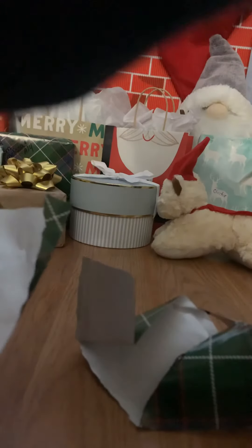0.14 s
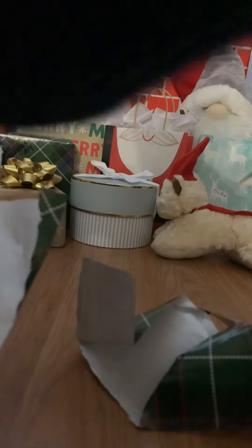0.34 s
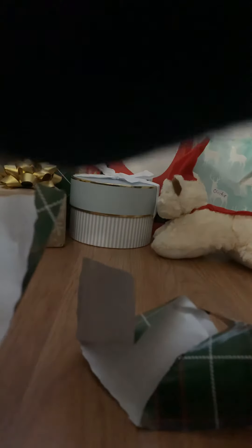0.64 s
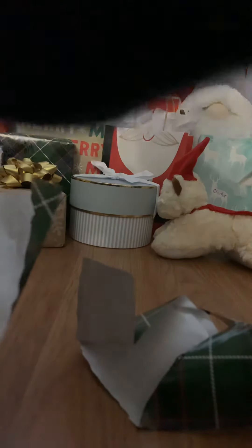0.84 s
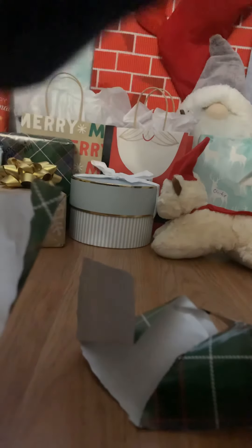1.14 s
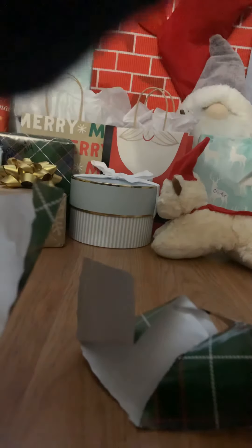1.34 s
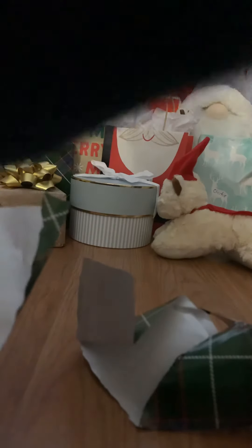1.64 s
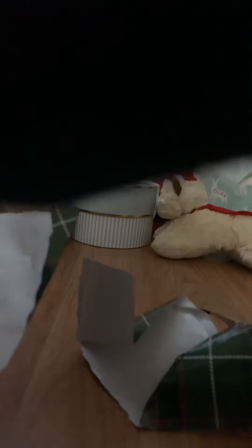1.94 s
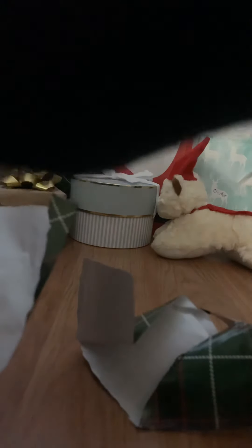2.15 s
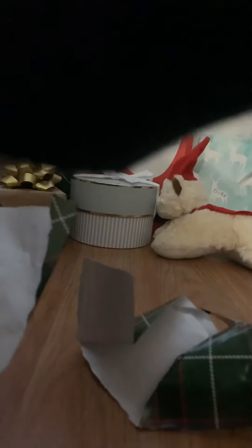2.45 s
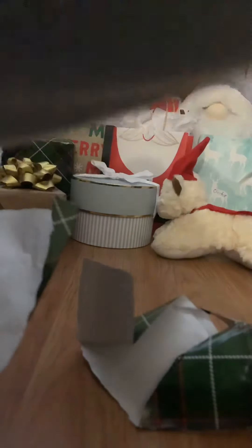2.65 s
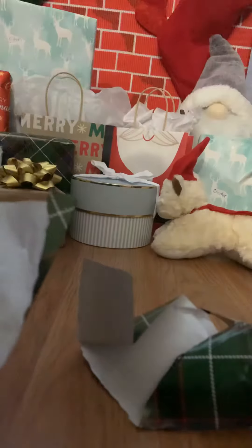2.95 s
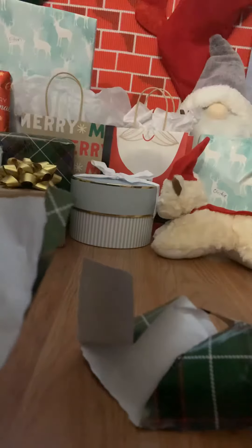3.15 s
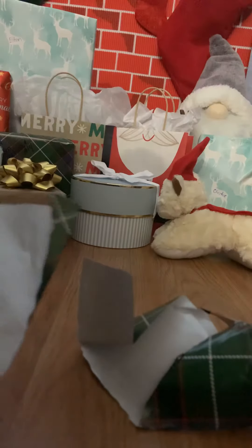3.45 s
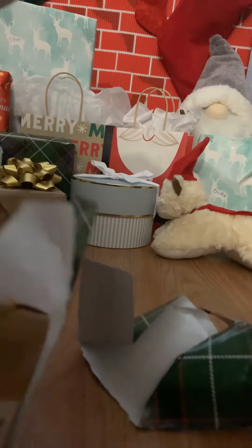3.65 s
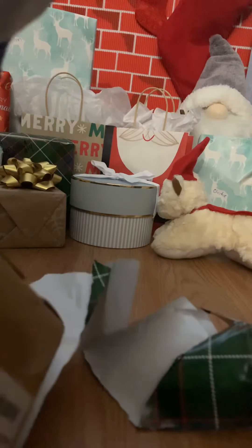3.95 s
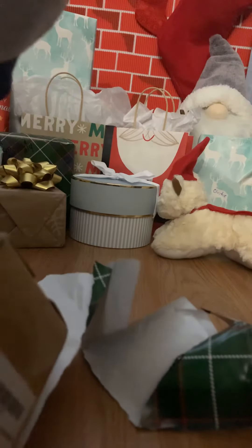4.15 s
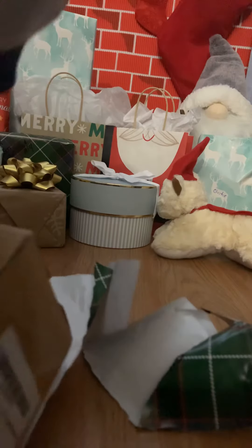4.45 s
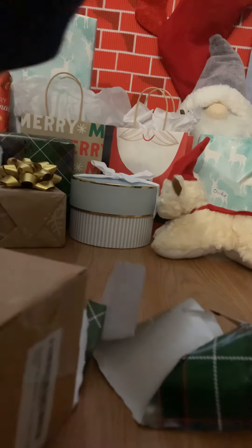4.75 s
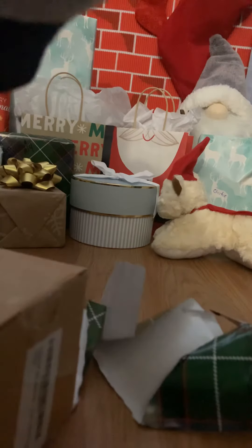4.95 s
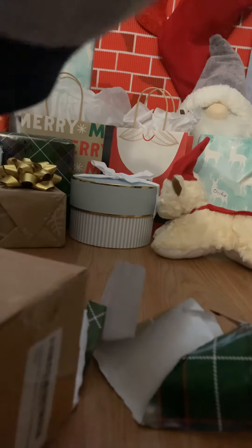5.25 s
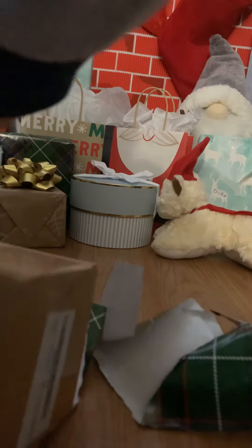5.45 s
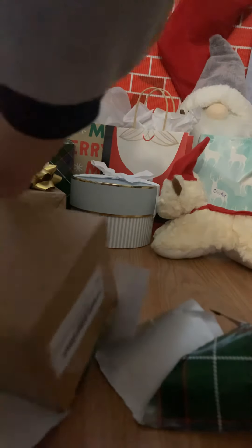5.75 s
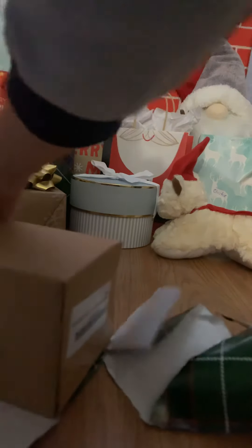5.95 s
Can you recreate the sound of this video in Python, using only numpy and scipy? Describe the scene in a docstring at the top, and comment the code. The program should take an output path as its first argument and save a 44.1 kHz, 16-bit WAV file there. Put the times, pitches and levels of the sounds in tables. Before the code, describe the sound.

Wrapping paper is ripped off a cardboard box by hand in short tears, with crinkles, soft knocks and rustling in a quiet room.

```python
"""In a small quiet room, close by, wrapping paper is ripped off a cardboard box by hand.
Hands slide over the parcel as hissing, humming grains; creases snap as short cascades of slips.
Fibres part in a few short tears of dense clicks, the last a stuttering one.
Bumps are damped panel tones with a rattle; box and floor modes and room echoes answer them."""
import sys
import numpy as np
from scipy import signal
from scipy.fft import rfft, irfft
from scipy.io import wavfile
from scipy.ndimage import uniform_filter1d

SR = 44100
rng = np.random.default_rng(int(sys.argv[2]) if len(sys.argv) > 2 else 0)


def master(y):
    """Save y as 16-bit WAV."""
    cut = np.clip(np.atleast_2d(y).T, -1, 1)
    pcm = np.round(cut * 32767)  # scale
    wavfile.write(sys.argv[1], SR, pcm.astype(np.int16))


N = 269892
TIME = np.arange(N) / SR


def amp(db):
    """Decibels to linear gain."""
    return 10 ** (np.asarray(db) / 20)


def unit(x):
    """Scale to rms 1."""
    return x / np.sqrt(np.mean(x ** 2) + 1e-20)


def read_curve(points, hz):
    """A table's value at hz, joined on a log-frequency axis."""
    table_hz, value = np.transpose(points)
    return np.interp(np.log(hz + 1), np.log(table_hz + 1), value)


def add(mix, start_s, sound):
    """Lay a sound into the mix, cut off at the mix's end."""
    part = mix[max(round(start_s * SR), 0):][:len(sound)]
    part += sound[:len(part)]


def colour(x, db_at, size=2048):
    """Causal minimum-phase filter whose gain in dB is db_at(Hz)."""
    gain_db = np.maximum(db_at(abs(np.fft.fftfreq(size, 1 / SR))), -100)
    log_gain = np.log(amp(gain_db))
    taps = np.fft.ifft(np.exp(np.conj(signal.hilbert(log_gain)))).real
    return signal.fftconvolve(x, taps[:size // 2])[:len(x)]


def hump(hz, centre_hz, octaves):
    """A bell of height 1 on the log-frequency axis."""
    return np.exp(-.5 * (np.log2((hz + 1) / centre_hz) / octaves) ** 2)


def shelf(hz):
    """0 in the body of the sound, 1 in its treble."""
    return hz ** 3 / (hz ** 3 + 3300 ** 3)


def wander(per_s):
    """Slow chance of rms 1, with per_s random turning points a second."""
    knots = rng.standard_normal(N // 20)
    return unit(np.interp(TIME * per_s, np.arange(len(knots)), knots))


def gate(start_s, length_s, attack_s, release_s):
    """Rises, holds for the length of the movement, dies away."""
    t = TIME - start_s
    return np.clip(t / attack_s, 0, 1) * np.exp(-np.maximum(t - length_s, 0) / release_s)


def grains(per_s, spread_db, clump_db, clumps_per_s):
    """Tiny clicks of uneven size that come in clumps."""
    size = amp(spread_db * np.minimum(rng.exponential(1, N), 4)) * rng.choice([-1, 1], N)
    lands = rng.random(N) < per_s / SR
    return unit(size * lands * amp(clump_db * wander(clumps_per_s)))


def sheet(x, ring_s):
    """Bending waves bounce about the paper: each click is smeared, and the slow low ones arrive last."""
    t = np.arange(1024) / SR
    hz = np.fft.rfftfreq(len(t), 1 / SR)
    bounces = rfft(rng.standard_normal(len(t)) * np.exp(-t / ring_s))
    lag = np.exp(-2j * np.pi * 0.0894 * np.sqrt(hz))
    # the square root halves the patch's peaks and dips in dB
    taps = irfft(bounces / abs(bounces) ** .5 * lag)
    return signal.fftconvolve(x, taps / np.linalg.norm(taps))[:len(x)]


def scattered(per_s, spread_db, clump_db, clumps_per_s, ring_s, count=8):
    """Grains that land on different patches of the sheet, each patch smearing them in its own way."""
    clicks = grains(per_s, spread_db, clump_db, clumps_per_s)
    patch = rng.integers(0, count, N)
    return unit(sum(sheet(clicks * (patch == k), ring_s) for k in range(count)))


# spectrum of the faint steady air: pitch_hz [Hz], level_db [dB, relative]
AIR_SPECTRUM = [(25, -26), (60, -1), (150, -3.5), (300, -4), (560, -22), (1600, -24.5), (2300, -21.5),
                (3900, -23), (4500, -26.5), (16000, -63.5)]
AIR_DB = -61.5  # rms


def air():
    """Steady noise of the quiet room's air, strongest in the bass."""
    noise = rng.standard_normal(N)
    return amp(AIR_DB) * unit(colour(noise, lambda hz: read_curve(AIR_SPECTRUM, hz), size=8192))


# a hand or the loose paper slides over the box:
# start_s [s], length_s [s], hollow_rub_db [dB], hiss_db [dB], nominal levels
STROKES = [(0.304, 0.082, -45, -55), (0.392, 0.13, -50, -58.5), (0.654, 0.046, -57, -51.5),
           (0.729, 0.12, -52.5, -68), (0.866, 0.076, -43, -63), (1.005, 0.11, -36.5, -47),
           (1.163, 0.055, -37, -44), (1.287, 0.18, -42, -49.5), (1.448, 0.046, -49, -44.5),
           (2.202, 0.11, -47, -48.5), (2.464, 0.037, -57, -74), (2.626, .05, -51, -50.5),
           (2.74, 0.11, -49.5, -58.5), (2.813, 0.073, -54, -49.5), (2.951, 0.21, -52, -43.5),
           (3.153, 0.14, -53, -49), (3.325, 0.28, -48.5, -53), (3.744, .13, -51.5, -54),
           (3.871, 0.22, -48, -47.5), (4.17, 0.17, -51.5, -43.5), (4.361, 0.1, -45.5, -43.5),
           (4.505, 0.094, -38, -37.5), (4.62, 0.046, -60, -66), (4.802, 0.2, -57.5, -57.5),
           (5.25, 0.65, -47, -69), (5.901, .16, -67, -58)]
# under the strokes the hands keep a faint rustle going while they hold the parcel:
# start_s [s], end_s [s], hollow_rub_db [dB], hiss_db [dB], nominal levels
HOLDS = [(0, 0.28, -62.5, -69), (.3, 0.58, -69, -62.5), (.9, 5.0, -60, -58)]
STROKE_RISE_SHARE = 0.3  # of the stroke's length
HOLD_RISE_S, STROKE_RELEASE_S = 0.062, 0.028


def hands():
    """Strength of the rub and of the hiss over time: swelling strokes on top of the steady hold."""
    moves = []
    for start_s, length_s, *levels_db in STROKES:
        moves.append((gate(start_s, length_s, STROKE_RISE_SHARE * length_s, STROKE_RELEASE_S), levels_db))
    for start_s, end_s, *levels_db in HOLDS:
        moves.append((gate(start_s, end_s - start_s, HOLD_RISE_S, STROKE_RELEASE_S), levels_db))
    power = sum(np.outer(amp(levels_db), shape) ** 2 for shape, levels_db in moves)
    unsteadiness = amp(0.63 * wander(per_s=25))
    return np.sqrt(power) * unsteadiness


# spectrum of the hollow rub: pitch_hz [Hz, before tipping], level_db [dB, relative]
RUB_SPECTRUM = [(40, -21.5), (80, -5), (150, -7), (230, 3.5), (340, 3), (520, -7.5), (700, -3.5),
                (860, -3.5), (1050, -16), (1400, -18.5), (2400, -23.5), (4000, -68)]
# tipped up off the floor, the box hums higher: time_s [s], pitch_factor [times the rub's pitches]
TIPPED = [(1.6, 0.99), (2.6, 1.03), (4.0, 1.27), (6.0, 1.01)]
# spectrum of the surface hiss and crinkle: pitch_hz [Hz], level_db [dB, relative]
HISS_SPECTRUM = [(500, -8), (1500, -5), (2500, -3.5), (4000, 0.5), (7500, 0), (8600, -7), (12000, -13),
                 (16000, -11.5)]
# the hiss above 16 kHz grows faster with level than the rest
TOP_ABOVE_HZ, TOP_FULL_DB, TOP_GROWTH = 16000, -49, 0.71


def slide():
    """Skin and paper catch and slip: the box hums hollowly, the surface hisses and crinkles."""
    rub_level, hiss_level = hands()

    slips = grains(per_s=1500, spread_db=2, clump_db=1.6, clumps_per_s=140)
    hz, t, z = signal.stft(slips, SR, nperseg=1024)
    pitch_factor = np.interp(t, *np.transpose(TIPPED))
    z = z * amp(read_curve(RUB_SPECTRUM, hz[:, None] / pitch_factor))
    rub = unit(signal.istft(z, SR, nperseg=1024)[1][:N])

    fine = grains(per_s=12000, spread_db=6.0, clump_db=3.0, clumps_per_s=99)
    hiss = unit(colour(fine, lambda hz: read_curve(HISS_SPECTRUM, hz)))
    highpass = signal.butter(4, TOP_ABOVE_HZ, "highpass", fs=SR, output="sos")
    top = signal.sosfiltfilt(highpass, hiss)
    hiss = hiss - top + top * (hiss_level / amp(TOP_FULL_DB)) ** TOP_GROWTH

    ticks = scattered(per_s=130, spread_db=3.8, clump_db=1.5, clumps_per_s=33, ring_s=0.0012)
    crinkle = unit(colour(ticks, lambda hz: read_curve(HISS_SPECTRUM, hz) + 15 * hump(hz, 1900, 0.76)))
    return rub_level * rub + hiss_level * (amp(-5) * hiss + amp(-8.5) * crinkle)


# the room's ring: pitch_hz [Hz], t60_s [s to fall 60 dB]
ROOM_DECAY = [(80, 0.85), (300, 0.21), (1000, 0.32), (5000, 0.27), (16000, 0.25)]


def room(x, early_db, early_s, tail_db):
    """Echoes off the floor and nearby parcels, then a short soft tail that fades by pitch."""
    t = np.arange(SR // 2) / SR
    sparse = rng.random((2, len(t))) < 3000 / SR
    near, far = rng.standard_normal((2, len(t))) * sparse
    near = near * np.exp(-t / early_s) * (t > .0015)
    hz, when, z = signal.stft(far * (t > .009), SR, nperseg=256)
    fade = np.exp(-np.log(1000) * when / read_curve(ROOM_DECAY, hz)[:, None])
    far = signal.istft(z * fade, SR, nperseg=256)[1][:len(t)]
    echoes = amp(early_db) * near / np.linalg.norm(near) + amp(tail_db) * far / np.linalg.norm(far)
    return signal.fftconvolve(x, echoes)[:N]


def burst(decay_s, rise_s, after_db, after_s, size):
    """A quick rattle, then a weaker shiver as the cardboard settles."""
    t = np.arange(size) / SR
    fade = np.exp(-t / decay_s) + amp(after_db) * np.exp(-t / after_s)
    return rng.choice([-1, 1], size) * fade * (1 - np.exp(-t / rise_s))


# the box is tapped, gripped or set down:
# start_s [s], peak_db [dB, before the group trim], pitch_hz [Hz, struck panel], decay_s [s]
BUMPS = [(.001, -33.5, 206, 0.0055), (0.051, -34, 185, 0.0078), (.14, -30, 223, 0.005),
         (.317, -32, 780, 0.0065), (.326, -25, 448, 0.0071), (0.334, -16.5, 150, 0.0033),
         (0.426, -36, 255, 0.01), (0.693, -32.5, 241, 0.0042), (0.933, -27, 234, 0.0072),
         (1.185, -18, 770, 0.00095), (1.19, -21, 341, 0.0068), (1.795, -34, 120, 0.003),
         (2.168, -21, 374, 0.013), (2.467, -36.5, 306, 0.011), (2.647, -29.5, 393, 0.02),
         (2.869, -33, 177, 0.011), (3.146, -27, 406, 0.0077), (4.202, -28, 332, 0.009),
         (4.604, -20, 167, 0.0072), (4.62, -21, 235, 0.0046), (4.627, -37, 62, 0.02),
         (5.328, -27, 334, 0.0081), (5.826, -14.5, 110.5, 0.011), (5.842, -21.5, 189, 0.0083)]
# spectrum of the dull rattle: pitch_hz [Hz], level_db [dB, relative]
THUD_SPECTRUM = [(25, -30), (55, -21), (110, -1), (170, -3), (350, -2), (550, -6.5), (850, -7.5),
                 (1500, -8.5), (4000, -34), (16000, -60.5)]


def bumps():
    """A soft blow swings one cardboard panel and sets the rest of the box rattling dully."""
    out, t = np.zeros(N), np.arange(8000) / SR
    for start_s, peak_db, pitch_hz, decay_s in BUMPS:
        # even the driest panel swings for a millisecond
        swing = np.sin(2 * np.pi * pitch_hz * t) * np.exp(-t / max(decay_s, 1e-3))
        swing = swing * (1 - np.exp(-t / 0.00096))
        rattle = burst(decay_s, rise_s=0.0005, after_db=-21.5, after_s=0.033, size=len(t))
        rattle = colour(rattle, lambda hz: read_curve(THUD_SPECTRUM, hz) + 8 * hump(hz, pitch_hz, 0.81),
                        size=4096)
        thud = unit(swing) + amp(1.0) * unit(rattle)
        add(out, start_s, amp(peak_db) * thud / abs(thud).max())
    return amp(-1.5) * out  # group trim


# modes of the cardboard box: pitch_hz [Hz], width_hz [Hz], gain_db [dB, before the send level]
BOX_MODES = [(112, 28, -24), (222, 14, 0), (300, 32, -29), (343, 25, -33), (448, 29, 3), (792, 89, 8),
             (990, 410, 5.5), (1090, 45, -17.5)]
# modes of the wooden floor under the box: pitch_hz [Hz], width_hz [Hz], gain_db [dB]
FLOOR_MODES = [(62, 20, -11), (115, 31, -2.5)]


def ring(x, modes):
    """Panels or boards ring briefly with whatever shakes them; a wider mode dies sooner."""
    t = np.arange(SR // 5) / SR
    answer = np.zeros(len(t))
    for pitch_hz, width_hz, gain_db in modes:
        fade = 2 * np.pi * width_hz / SR * np.exp(-np.pi * width_hz * t)
        answer += amp(gain_db) * fade * np.sin(2 * np.pi * pitch_hz * t)
    return signal.fftconvolve(x, answer)[:N]


# spectrum of a snapping crease: pitch_hz [Hz], level_db [dB, relative]
CREASE_SPECTRUM = [(80, -29), (200, -16), (350, 4), (580, -6.5), (800, -0.5), (1100, 4.5), (1600, 2),
                   (2800, 1.5), (5000, 1.5), (7500, -1), (8600, -7), (12000, -9), (16000, -16)]
# a faint noise swells just before each snap, then the first slip is the sharpest
LEAD_S, LEAD_NOISE_S, LEAD_NOISE_DB = .012, 0.011, -28.5
FIRST_SLIP_DB, FIRST_SLIP_S = 2, 0.00037
# the patch that snaps rings at one main pitch, among weaker chance resonances
PATCH_RING_DB, PATCH_RING_OCTAVES, PATCH_RIPPLE_DB = 7.5, 0.125, 2.6


def snap(level_db, length_s, treble_db, ring_hz):
    """A faint swell of noise, a short cascade of slips in one patch of paper, a weak shiver as it settles."""
    t = np.arange(3500) / SR - LEAD_S  # the paper gives way at t = 0
    age = np.maximum(t, 0)
    cascade = (1 - np.exp(-age / (.12 * length_s))) * np.exp(-(age / (1.1 * length_s)) ** 2)
    first = amp(FIRST_SLIP_DB) * np.exp(-(t / FIRST_SLIP_S) ** 2)
    lead_noise = amp(LEAD_NOISE_DB) * np.exp(-abs(t) / LEAD_NOISE_S)
    shiver = amp(-28) * np.exp(-age / 0.013)
    patch = list(zip(np.geomspace(500, 16000, 70), rng.standard_normal(70)))
    slips = rng.choice([-1, 1], len(t)) * (cascade + first + np.where(t < 0, lead_noise, shiver))

    def patch_db(hz):
        """Crease spectrum with this patch's treble, main ring and chance resonances."""
        tone = read_curve(CREASE_SPECTRUM, hz) + treble_db * shelf(hz)
        main_ring = PATCH_RING_DB * hump(hz, ring_hz, PATCH_RING_OCTAVES)
        return tone + main_ring + PATCH_RIPPLE_DB * read_curve(patch, hz)

    crack = sheet(colour(slips, patch_db, size=1024), ring_s=0.00014)
    # a longer snap carries more energy at the same level
    return amp(level_db) * crack * np.sqrt(length_s * SR) / np.linalg.norm(crack)


# a crease buckles or the paper's edge gives way: start_s [s], level_db [dB, before the group trim],
# length_s [s], treble_db [dB over the body], ring_hz [Hz, main ring of that patch]
SNAPS = [(0.0484, -30.5, 0.0043, -38, 1630), (0.325, -31.5, 0.005, -6.5, 895),
         (0.348, -32, 0.0064, -25, 870), (.932, -38, 0.0039, -15, 1570), (0.959, -35.5, 0.0052, -18, 1040),
         (1.011, -36, 0.0022, -23, 856), (1.03, -36, 0.0026, -13, 900), (1.0614, -32.5, 0.0073, -16.5, 870),
         (1.1472, -31, 0.0078, -9, 5000), (1.158, -35.5, 0.0083, 19, 5660),
         (1.181, -15, 0.0051, -4.5, 2850), (1.191, -24, 0.0094, 14, 2870), (1.212, -27.5, 0.0054, 0, 6860),
         (1.59, -28, 0.0023, -4.5, 5400), (1.628, -37, 0.0069, 1, 3940), (1.696, -22.5, 0.00082, -15, 860),
         (1.7315, -33, 0.011, -2, 3900), (1.7466, -30, .012, 3, 4520), (1.7628, -21.5, 0.0063, -4, 4360),
         (2.3507, -25, .003, -6.5, 2030), (2.6397, -39.5, 0.03, -25, 2750),
         (2.748, -37.5, 0.0035, -18, 2640), (3.0597, -20.5, 0.0027, -1, 3360),
         (3.074, -32.5, 0.0095, -7, 1380), (3.1224, -23.5, 0.0085, 3, 6740),
         (3.136, -19.5, 0.021, 10, 3830), (3.262, -32, 0.0019, 11, 3480),
         (3.3833, -24.5, 0.0054, -12, 2320), (3.48, -14.5, 0.002, 1, 6560), (3.518, -24, 0.0014, -4, 3280),
         (3.5375, -23, 0.0081, 8, 2830), (3.551, -28.5, 0.0033, -3, 3700), (3.5638, -24, .0065, 3.5, 3360),
         (3.7602, -33, 0.0054, -18, 950), (3.8225, -36, 0.003, -25, 2040), (4.0277, -29, 0.0057, -19, 1550),
         (4.0697, -24.5, 0.0029, -11, 2050), (4.115, -37, 0.017, -1, 5450),
         (4.201, -24.5, 0.0061, -10.5, 5400), (4.2103, -24, 0.0054, 1.5, 6400),
         (4.2515, -23, 0.0014, 2, 7100), (4.307, -32.5, .006, -1, 6960), (4.365, -34.5, 0.012, 0, 5570),
         (4.391, -26.5, 0.0049, -5.5, 5600), (4.404, -31.5, 0.003, -6, 3450),
         (4.4432, -21.5, 0.0025, -7, 2090), (4.5131, -16, 0.0023, -5, 2100),
         (4.534, -23.5, 0.008, -6.5, 3830), (4.5528, -17.5, 0.0075, -6, 3700),
         (4.58, -23.5, 0.0075, -5.5, 1980), (4.607, -24.5, 0.0014, 4, 4630), (4.766, -41, 0.0065, -9, 1090),
         (4.8273, -35.5, 0.0098, -2.5, 4300), (4.846, -28, 0.0026, -1, 1120), (4.911, -28, .0044, -8, 4300),
         (4.92, -30, 0.0048, 0, 990), (4.9726, -39, 0.0047, 2.5, 2650), (5.201, -26.5, 0.0055, 4.5, 2200),
         (5.218, -24, .002, -2, 5450), (5.259, -20.5, 0.006, -1, 5600), (5.2866, -23, 0.0042, -0.5, 4100),
         (5.329, -24, 0.0063, -5, 7150), (5.365, -28.5, 0.01, -8, 7900), (5.385, -22, 0.0017, 25, 7900),
         (5.4373, -21.5, 0.0024, -20, 1450), (5.461, -20.5, 0.0026, -5, 2870),
         (5.486, -20, 0.001, -5, 3570), (5.523, -22.5, 0.0063, -9, 2800), (5.5555, -25, .006, -7, 2800),
         (5.57, -12.5, 0.00065, -2, 2720), (5.591, -22.5, 0.0073, 4, 2800), (5.636, -19, 0.0053, 25, 9300),
         (5.788, -15.5, 0.001, 8, 5800), (5.8728, -13.5, 0.00098, 3, 5660)]
# weaker snaps trail each one as the crease relaxes
TRAIL_COUNT, TRAIL_GAP_S, TRAIL_STEP_DB = 2, 0.013, -14.5


def snaps():
    """Creases buckle one by one, each with a trail of weaker snaps."""
    out = np.zeros(N)
    for start_s, level_db, length_s, treble_db, ring_hz in SNAPS:
        for k, gap in enumerate(rng.uniform(.5, 1.5, TRAIL_COUNT + 1)):
            sound = snap(level_db + k * TRAIL_STEP_DB, length_s, treble_db, ring_hz)
            add(out, start_s - LEAD_S, sound)
            start_s += gap * TRAIL_GAP_S
    return amp(-1.06) * out  # group trim


# one pull of the paper: start_s [s], length_s [s], level_db [dB, before the group trim],
# level_change_db [dB over the pull], treble_db [dB, nominal], treble_change_db [dB over the pull],
# first_ring_hz [Hz, flap at the start], last_ring_hz [Hz, flap once settled]
TEARS = [(1.772, 0.23, -23.5, -1, 3.5, -4, 4300, 2430), (1.965, 0.26, -24, -5, -7, 0.5, 2650, 2410),
         (3.128, 0.071, -31, 6.5, 0.5, 5, 3600, 2280), (5.27, 0.23, -37, 2, -4.5, 3, 2680, 2620),
         (5.555, 0.207, -35.5, 4.5, 1.5, 7.5, 2800, 2680), (5.77, 0.098, -37, 0, 4.5, 4, 2850, 2760)]
TEAR_ATTACK_S, TEAR_RELEASE_S, FLAP_SETTLE_S = 0.01, 0.0094, 0.076


def pulls():
    """Level, treble and flap ring over time: each pull drifts evenly, and its flap rings lower as it grows."""
    level, treble_db = np.zeros(N), np.zeros(N)
    flap_hz = np.full(N, float(TEARS[0][-1]))
    for start_s, length_s, level_db, level_change_db, bright_db, brighten_db, first_hz, last_hz in TEARS:
        age = np.clip(TIME - start_s, 0, length_s)
        begun = TIME > start_s - TEAR_ATTACK_S
        shape = gate(start_s, length_s, TEAR_ATTACK_S, TEAR_RELEASE_S)
        level = np.maximum(level, shape * amp(level_db + level_change_db * age / length_s))
        treble_db = np.where(begun, bright_db + brighten_db * age / length_s, treble_db)
        settling_hz = last_hz + (first_hz - last_hz) * np.exp(-age / FLAP_SETTLE_S)
        flap_hz = np.where(begun, settling_hz, flap_hz)
    return level, treble_db, flap_hz


# spectrum of the parting fibres: pitch_hz [Hz], level_db [dB, relative]
FIBRE_SPECTRUM = [(80, -16), (163, -5), (330, 3.5), (450, 2.5), (620, -4.5), (900, 5), (1200, 5),
                  (1700, -2), (2900, 0.5), (4200, -2), (7500, -3.5), (8600, -7), (13000, -9.5),
                  (16000, -15.5)]
# coarse fibres crackle through the fine ones
COARSE_PER_S, COARSE_DB = 200, -6.5


def tears():
    """Fibres part by the thousand, and the loose flap lends a falling ring with overtones."""
    level, treble_db, flap_hz = pulls()
    fine = scattered(per_s=6000, spread_db=2.8, clump_db=2.2, clumps_per_s=280, ring_s=.0006)
    coarse = scattered(COARSE_PER_S, spread_db=1.5, clump_db=-1.0, clumps_per_s=60, ring_s=0.00028)
    fibres = fine + amp(COARSE_DB) * coarse
    fibres = unit(colour(fibres, lambda hz: read_curve(FIBRE_SPECTRUM, hz)))
    hz, t, z = signal.stft(fibres, SR, nperseg=512)
    hz = hz[:, None]
    # peaks at every multiple of the flap's pitch
    overtones = np.cos(np.pi * hz / np.interp(t, TIME, flap_hz)) ** 6 * hump(hz, 4200, 1.1)
    # the sheet's resonances shift as it bends
    flexing = uniform_filter1d(rng.standard_normal(z.shape), size=4, axis=0)
    flexing = unit(uniform_filter1d(flexing, size=7, axis=1))
    brightness = shelf(hz) * (np.interp(t, TIME, treble_db) - 0.5)
    z = z * amp(brightness + 4.4 * overtones + 1.9 * flexing)
    return amp(-2.03) * level * signal.istft(z, SR, nperseg=512)[1][:N]  # group trim


# late on, the tear sticks and jumps; jitter is a share of the time between jumps
STUTTER_START_S, STUTTER_END_S, JUMPS_PER_S, JUMP_JITTER = 5.3, 5.71, 55, .25
JUMP_DB, JUMP_SPREAD_DB, JUMP_LENGTH_S = -22, 0.8, 0.0022
JUMP_TREBLE_DB, JUMP_TREBLE_SPREAD_DB, JUMP_RING_HZ = 8, 14.5, 2800


def stutter():
    """The tear catches and jumps ahead at a loosely regular rate, one snap a jump."""
    out = np.zeros(N)
    for k, (late, strong, bright) in enumerate(rng.standard_normal(size=(36, 3))):
        start_s = STUTTER_START_S + (k + JUMP_JITTER * late) / JUMPS_PER_S
        level_db = JUMP_DB + JUMP_SPREAD_DB * strong
        treble_db = JUMP_TREBLE_DB + JUMP_TREBLE_SPREAD_DB * bright
        jump = snap(level_db, JUMP_LENGTH_S, treble_db, JUMP_RING_HZ)
        add(out, start_s - LEAD_S, jump * (start_s < STUTTER_END_S))
    return out


def scene():
    """Paper, box and floor together in the quiet room."""
    paper = snaps() + stutter() + tears()
    knocks = bumps()
    hollow_box = amp(-15.5) * ring(paper, BOX_MODES) + amp(-10.5) * ring(knocks, BOX_MODES)
    parcel = paper + knocks + hollow_box + slide()
    # blows also shake the wooden floor
    floor_boom = ring(knocks, FLOOR_MODES) + room(knocks, early_db=-30, early_s=0.021, tail_db=-15.0)
    echoes = room(parcel, early_db=-13.5, early_s=0.0064, tail_db=-16)
    return (parcel + echoes + floor_boom + air())[None]


EDGE_HZ = 16100  # top of the microphone's band


def record(dry):
    """The microphone loses the deepest bass and stops at its band limit."""
    highpass = signal.butter(4, 42, "highpass", fs=SR, output="sos")
    thinned = signal.sosfilt(highpass, dry)
    band_limit = signal.firwin(401, EDGE_HZ, window=("kaiser", 8), fs=SR)
    return signal.oaconvolve(thinned, band_limit[None], "same")


dry = scene()
out = record(dry)
master(out)
```